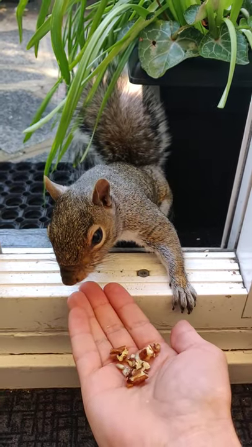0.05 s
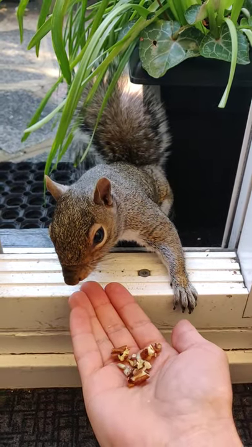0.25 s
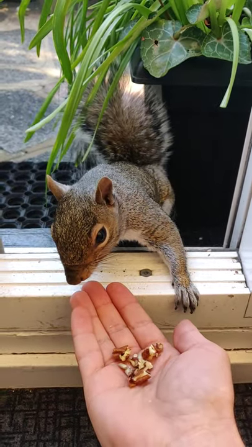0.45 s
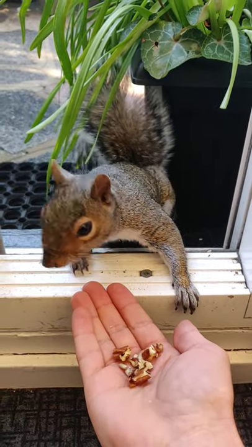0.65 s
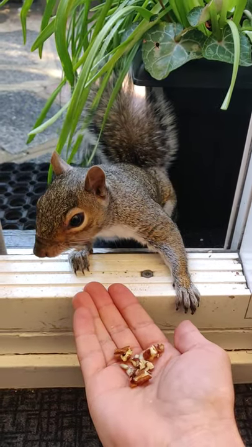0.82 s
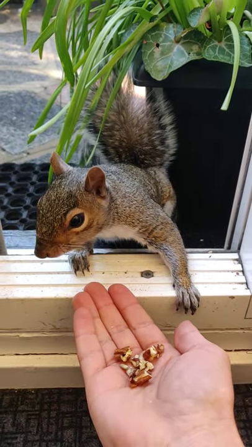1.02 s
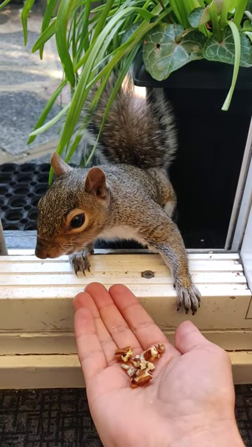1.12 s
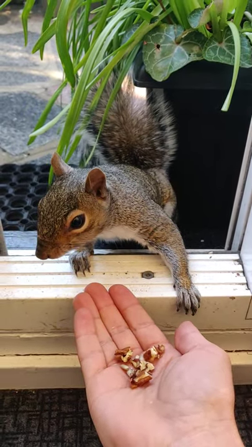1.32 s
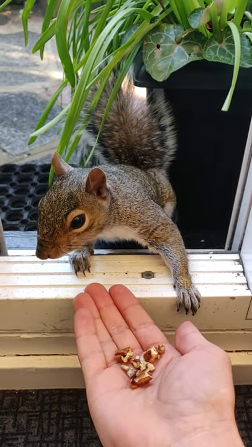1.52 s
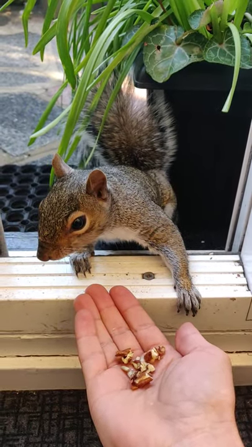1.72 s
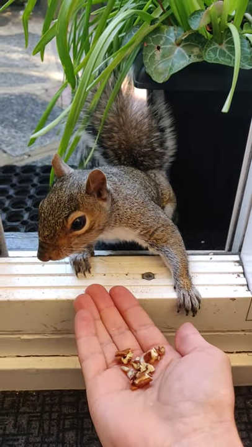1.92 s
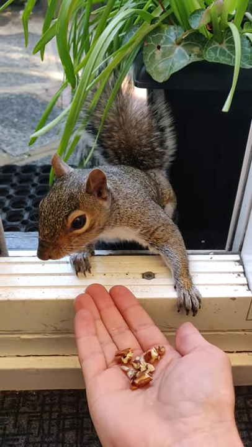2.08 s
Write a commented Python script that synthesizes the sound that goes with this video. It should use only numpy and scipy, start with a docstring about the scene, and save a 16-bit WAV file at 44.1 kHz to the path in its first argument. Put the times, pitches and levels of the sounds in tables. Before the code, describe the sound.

Low thud and rub of a hand-held phone, followed by tiny claw ticks on a windowsill.

```python
"""A hand-held phone gives one dull, dying shudder as the slipping grip excites its low modes.
Skin rubs and scuffs the case. On the sill of the open window a squirrel shifts: its claws tick faintly,
a paw tap rings the sill, and there is a brief high rustle. Air nudges the left microphone port.
Behind it lie a murmur of distant traffic, microphone hiss and a thin far squeal, probably a brake."""
import sys
import numpy as np
from scipy import signal
from scipy.fft import rfft, irfft
from scipy.io import wavfile
from scipy.ndimage import uniform_filter1d

SR = 44100
rng = np.random.default_rng(int(sys.argv[2]) if len(sys.argv) > 2 else 0)


def transcribe(signal):
    """Save signal, clipped to [-1, 1], as a 16-bit WAV file at the path in sys.argv[1]."""
    frames = np.atleast_2d(signal).T
    limited = np.clip(frames, -1, 1)
    pcm = np.round(limited * 32767).astype(np.int16)
    wavfile.write(sys.argv[1], SR, pcm)


N = 94815

# Noise spectra (frequency [Hz], relative spectral density [dB])
TRAFFIC_SPECTRUM = [(20, -32.5), (60, 0.5), (140, -1.5), (220, -5), (310, -8), (420, -11.5), (750, -12.5),
                    (1200, -19), (2000, -22), (4000, -31), (12000, -35)]
HISS_SPECTRUM = [(100, 3), (2500, -1), (4500, -1), (7000, -1), (9500, -2.5), (15500, -1)]
RUSTLE_SPECTRUM = [(3500, -29), (4500, 10), (4800, 19), (5200, -16), (6500, -19)]
DRAUGHT_SPECTRUM = [(15, 2), (35, -1), (70, -4.5), (150, -21.5), (400, -38.5), (1500, -68)]
SCRAPE_SPECTRUM = [(300, -5), (750, 1.5), (1500, -9), (2500, -10), (4600, -8), (6800, -10), (8000, -38)]
SCUFF_SPECTRUM = [(150, -5.5), (300, 5.5), (450, -1), (700, 1), (1050, -13.5), (1700, -16.5), (3000, -29.5),
                  (8000, -45)]
RUB_SPECTRUM = [(20, -27), (44, -24), (62, 8.5), (82, -1), (112, 2), (172, -3), (212, -13), (290, -21),
                (600, -28.5), (1200, -43), (3000, -54), (10000, -57)]
# Noise envelopes (time [s], level [dB])
TRAFFIC_ENVELOPE = [(0, -65), (.55, -64), (.85, -64), (1.15, -66), (1.4, -65), (1.7, -64.5), (2.15, -66)]
RUSTLE_ENVELOPE = [(1.66, -100), (1.74, -80.5), (1.83, -83.5), (1.92, -100)]
SCUFF_ENVELOPE = [(.21, -81), (.25, -62.5), (.30, -63), (.35, -64), (.39, -67.5), (.46, -72.5), (.58, -86)]
# Envelope of the grip's rubbing (time [s], relative level [dB])
RUB_ENVELOPE = [(0, -55.5), (.1, -60.5), (.19, -56.5), (.24, -40), (.35, -42.5), (.41, -46.5), (.49, -43.5),
                (.57, -50.5), (.68, -52), (.76, -59), (1.0, -66), (1.5, -80.5), (1.68, -59.5), (1.8, -87),
                (2.15, -61)]
# Modes of the sill and of the held phone (frequency [Hz], decay time T60 [s], relative level [dB])
SILL_MODES = [(800, 0.018, 3), (980, 0.025, -20), (1490, 0.037, -7), (3370, 0.013, -6), (4600, 0.025, -6),
              (5850, .015, -9), (6700, .015, -6)]
PHONE_MODES = [(58.1, 0.24, -5), (111, 0.11, -7.5), (133, 0.12, -0.5), (171, 0.19, -10.5)]
# Bursts of the far squeal (start [s], duration [s], frequency [Hz], level [dB])
SQUEAL_BURSTS = [(1.375, 0.063, 1915, -84), (1.451, 0.015, 1893, -77.5), (1.481, 0.021, 1795, -75),
                 (1.505, .034, 1776, -78), (1.558, 0.027, 1725, -83), (1.755, .128, 1910, -76),
                 (1.903, 0.021, 1910, -78.5), (1.938, 0.083, 1914, -83)]
# Pressure pulses at the left port (centre time [s], peak level [dB], centre-to-peak time [s])
AIR_PUFFS = [(1.186, -41.5, 0.0034), (1.751, -43, 0.0052), (2.059, -47, 0.0059), (2.101, -45, 0.0047)]
# Claw contacts (time [s], level [dB], centre frequency [Hz], spread [octaves], decay time T60 [s])
CLAW_TICKS = [(0.404, -57.5, 7600, 0.28, 0.0043), (0.421, -58.5, 7500, 0.2, 0.018),
              (0.437, -53.5, 6900, 0.19, 0.0047), (0.478, -63, 7850, 0.084, 0.04),
              (.702, -60, 2230, 0.47, 0.015), (.853, -59.5, 1730, 0.58, 0.055),
              (0.852, -58.5, 6300, 0.95, 0.036), (.943, -63, 6500, 0.33, 0.0087),
              (1.215, -63, 5700, 0.28, 0.009), (1.276, -60, 5750, 0.58, 0.0074),
              (1.290, -63.5, 6400, 0.46, 0.0096), (1.329, -61.5, 2050, 0.99, 0.014),
              (1.570, -63, 1610, 0.72, 0.023), (1.609, -62, 6550, 1, 0.012),
              (1.711, -62, 2080, 0.25, 0.011), (1.776, -65, 6460, 0.37, 0.0065),
              (1.838, -67, 7350, 0.17, .008), (2.022, -59, 1200, 0.57, 0.01)]
# Jerks of the slipping grip (time [s], drive level [dB])
GRIP_KNOCKS = [(.238, -30), (0.2531, -23.5), (0.2651, -29.5), (0.2713, -19.5), (0.2973, -29.5),
               (0.3029, -29), (0.3091, -27.5), (.316, -28.5), (0.3458, -29), (0.3548, -35.5), (0.363, -31),
               (.382, -35), (.408, -36), (0.4356, -29), (0.469, -34.5), (0.514, -44), (.567, -38.5),
               (0.645, -43), (.697, -44), (1.653, -54), (1.685, -44.5)]

SILL_PAN_DB = 3.5


def undb(db):
    """Amplitude ratio of a level in decibels."""
    return 10 ** (np.asarray(db) / 20)


def unit(x):
    """Normalisation to an rms of one."""
    return x / np.sqrt(np.mean(x ** 2))


def pan(db):
    """Interchannel level difference: gains that put the left db above the right."""
    return undb(np.array([[db], [-db]]) / 2)


def envelope(rows):
    """Linear interpolation of a level over time."""
    times, levels = np.array(rows).T
    return np.interp(np.arange(N) / SR, times, levels)


def drift(rate_hz):
    """Random modulation of unit rms: random steps, smoothed twice."""
    hold = int(SR / rate_hz)
    steps = np.repeat(rng.standard_normal(N // hold + 1), hold)
    return unit(uniform_filter1d(uniform_filter1d(steps, hold), hold)[:N])


def noise(spectrum, coherent_hz):
    """Spectrally shaped stereo noise of unit rms, losing coherence above coherent_hz."""
    hz = np.arange(N // 2 + 1) * SR / N + 1
    knots_hz, db = np.array(spectrum).T
    gain = undb(np.interp(np.log(hz), np.log(knots_hz), db))
    coherence = 1 / (1 + (hz / coherent_hz) ** 2)
    mid, side = rfft(rng.standard_normal((2, N))) * gain * np.sqrt([1 + coherence, 1 - coherence])
    return unit(irfft(np.array([mid + side, mid - side]), N))


def decay(t, t60):
    """Exponential damping by 60 dB in t60 seconds."""
    return np.exp(-np.log(1000) * t / t60)


def ring(modes):
    """Modal impulse response: a sum of damped sinusoids, scaled to a peak of one."""
    t = np.arange(SR // 2) / SR
    response = sum(undb(db) * np.sin(2 * np.pi * hz * t) * decay(t, t60) for hz, t60, db in modes)
    return response / abs(response).max()


def add(out, start_s, sound):
    """Superposition of a sound from a given time onward."""
    i = int(start_s * SR)
    n = min(sound.shape[-1], N - i)
    out[..., i:i + n] += sound[..., :n]


def microphone_hiss():
    """Self-noise of the microphone: stationary and nearly white."""
    return noise(HISS_SPECTRUM, coherent_hz=57) * undb(-69.5)


def traffic():
    """Distant traffic sums incoherently to a low murmur whose level wavers slightly."""
    level_db = envelope(TRAFFIC_ENVELOPE) + 1.5 * drift(rate_hz=18)
    return noise(TRAFFIC_SPECTRUM, coherent_hz=278) * undb(level_db) * pan(db=4.5)


def far_squeal():
    """A thin tone catches in short bursts, prolonged by the reverberation of the street."""
    edge_s, jitter_hz, flutter_db = .012, 2, .7
    t, tone = np.arange(N) / SR, np.zeros(N)
    jitter_cycles = np.cumsum(jitter_hz * drift(rate_hz=60)) / SR
    for start, duration, hz, db in SQUEAL_BURSTS:
        gate = np.clip(np.minimum(t - start, start + duration - t) / edge_s + .5, 0, 1)
        phase = 2 * np.pi * (hz * (t - start) + jitter_cycles)
        tone += np.sqrt(2) * undb(db) * gate * np.sin(phase)
    tone *= undb(flutter_db * drift(rate_hz=45.2))
    street = rng.standard_normal((2, SR)) * decay(t[:SR], t60=1)
    reverberation = signal.fftconvolve(tone[None], unit(street) / np.sqrt(SR), axes=1)[:, :N]
    return (tone + undb(-13) * reverberation) * pan(db=7.5)


def rustle():
    """Narrow-band noise near 4.8 kHz swells and fades as a faint rustle."""
    return noise(RUSTLE_SPECTRUM, coherent_hz=5000) * undb(envelope(RUSTLE_ENVELOPE)) * pan(SILL_PAN_DB)


def draught():
    """Pressure fluctuations of moving air, mostly at the left port: a rumble and a few bipolar puffs."""
    level_db = -64.5 + 2 * drift(rate_hz=5.82)
    out = noise(DRAUGHT_SPECTRUM, coherent_hz=11) * undb(level_db) * pan(db=12)
    for centre, db, width in AIR_PUFFS:
        u = (np.arange(N) / SR - centre) / width
        out[0] -= undb(db) * u * np.exp((1 - u ** 2) / 2)  # a push, then a pull
    return out


def claw_ticks():
    """Brief claw contacts radiate damped bursts of noise, each in its own frequency band."""
    size, attack_s, diffuse_gain = 2 ** 12, .0011, .6
    out = np.zeros((2, N))
    t, hz = np.arange(size) / SR, np.arange(size // 2 + 1) * SR / size + 1
    for start, db, centre_hz, octaves, t60 in CLAW_TICKS:
        band = np.exp(-.5 * (np.log2(hz / centre_hz) / octaves) ** 2)
        grit = irfft(rfft(rng.standard_normal((3, size))) * band)  # common, left, right
        attack = 1 - np.exp(-t / attack_s)
        tick = (grit[0] + diffuse_gain * grit[1:]) * attack * decay(t, t60)
        add(out, start, undb(db) * tick / abs(tick).max())
    return out * pan(SILL_PAN_DB)


def paw_tap():
    """Impact excitation: a paw lands with a short dry scrape and sets the sill's modes ringing."""
    tap_s, scrape_s = 2.003, .0039
    t = np.arange(N) / SR - tap_s
    contact = np.exp(-.5 * (t / scrape_s - .5) ** 2)
    out = noise(SCRAPE_SPECTRUM, coherent_hz=2000) * undb(-64) * contact
    add(out, tap_s, undb(-53) * ring(SILL_MODES))
    return out * pan(SILL_PAN_DB)


def skin_scuff():
    """Stick-slip friction of skin on the case: noise made grainy by rapid amplitude modulation."""
    grain_db = 2.5 * drift(rate_hz=250)
    return noise(SCUFF_SPECTRUM, coherent_hz=604) * undb(envelope(SCUFF_ENVELOPE) + grain_db) * pan(db=6)


def grip_shudder():
    """Forced vibration: soft jerks of the grip drive the phone's low modes, over friction noise."""
    push_s, low_cut_hz, right_delay_s = .0027, 73, .00044
    push = np.hanning(int(2 * push_s * SR))  # a soft force pulse favours the low modes
    knock = signal.fftconvolve(ring(PHONE_MODES), push / push.sum())
    knocks = np.zeros(N)
    for start, db in GRIP_KNOCKS:
        add(knocks, start - push_s / 2, -undb(db) * knock)
    low_cut = signal.butter(2, low_cut_hz, "high", fs=SR, output="sos")
    rubbing = noise(RUB_SPECTRUM, coherent_hz=590) * undb(envelope(RUB_ENVELOPE) - .5)
    left, right = signal.sosfiltfilt(low_cut, knocks) + rubbing
    t = np.arange(N) / SR
    delayed_right = np.interp(t - right_delay_s, t, right)
    return np.array([left, delayed_right]) * pan(db=5.5)


def scene():
    """Linear superposition of all sources, from the background to the shudder."""
    background = microphone_hiss() + traffic() + far_squeal() + rustle() + draught()
    return background + claw_ticks() + paw_tap() + skin_scuff() + grip_shudder()


def record(dry):
    """Band limiting: the phone's steep low-pass filter removes the highest treble."""
    cutoff_hz = 15850
    return signal.sosfilt(signal.ellip(10, .2, 70, cutoff_hz, fs=SR, output="sos"), dry)


dry = scene()
out = record(dry)
transcribe(out)
```